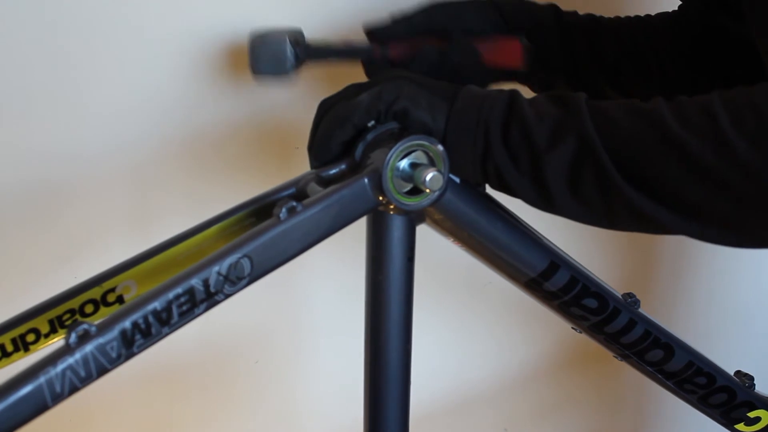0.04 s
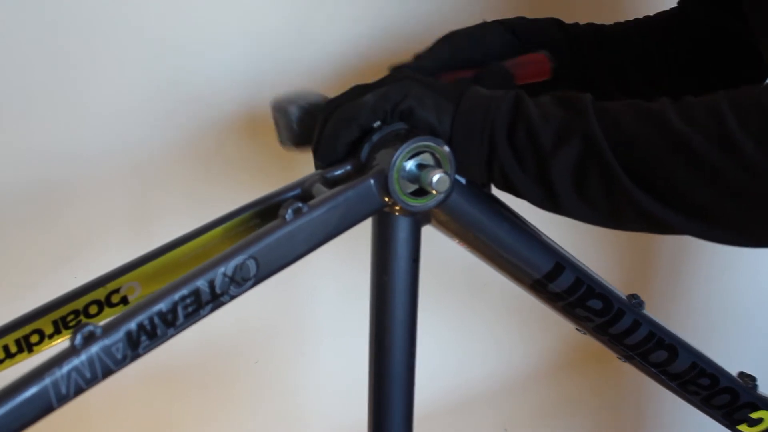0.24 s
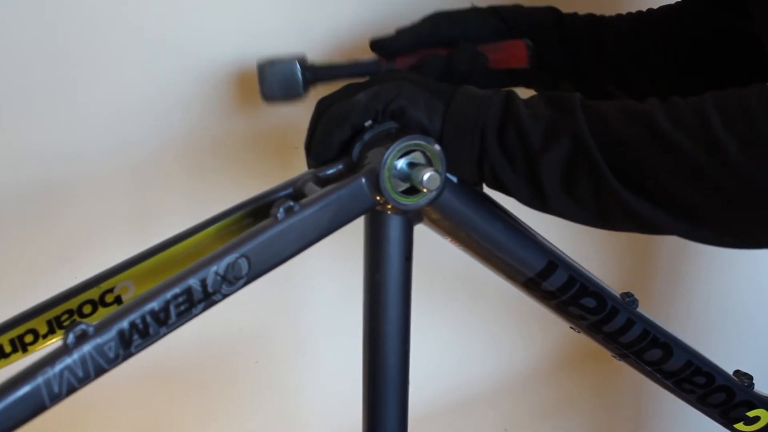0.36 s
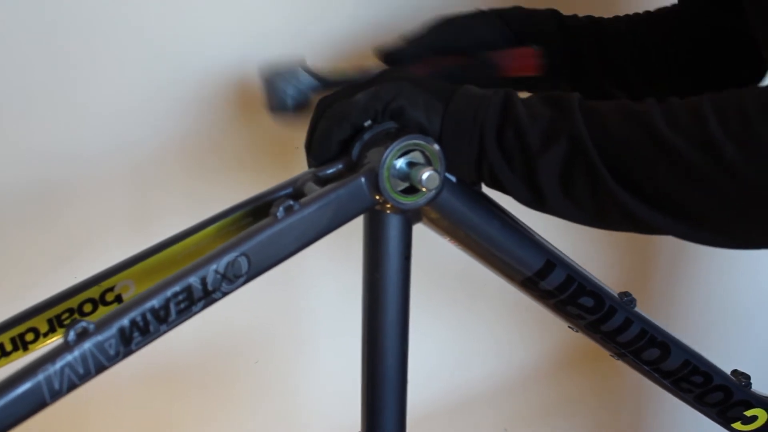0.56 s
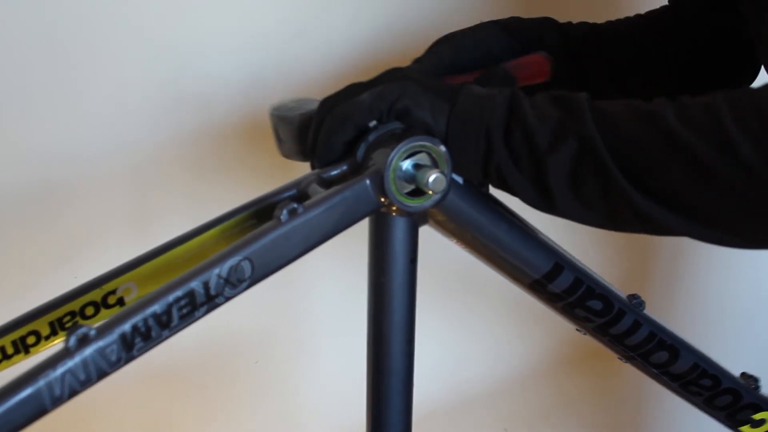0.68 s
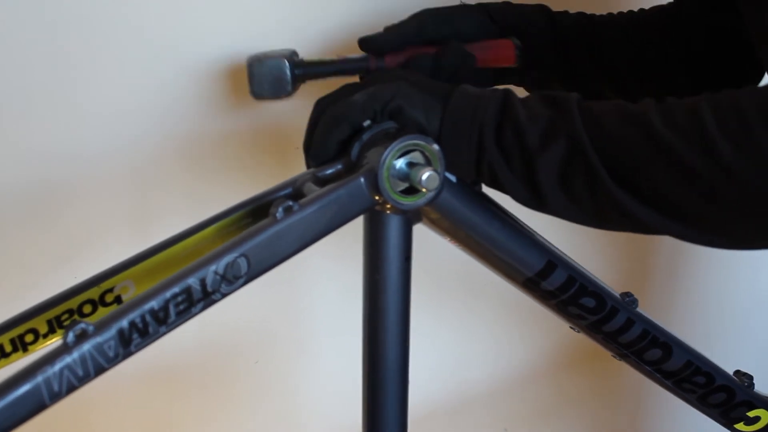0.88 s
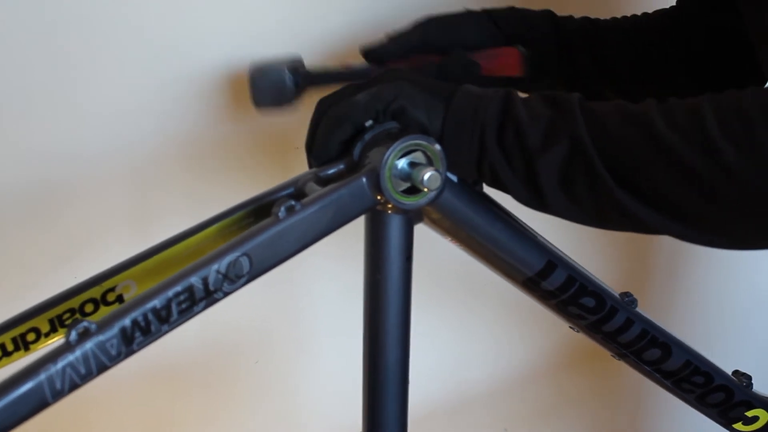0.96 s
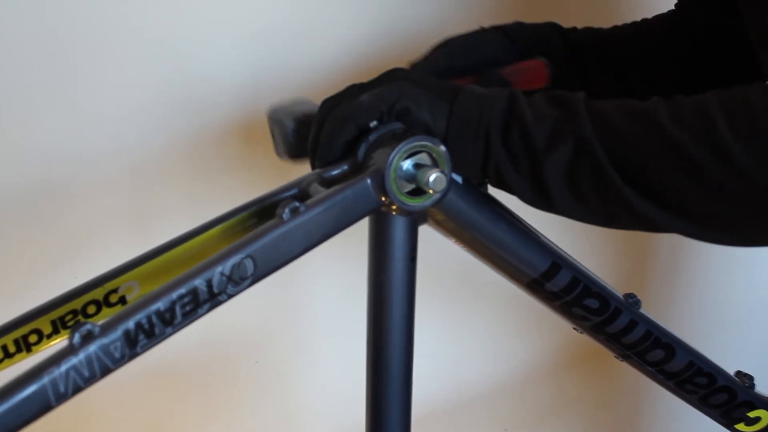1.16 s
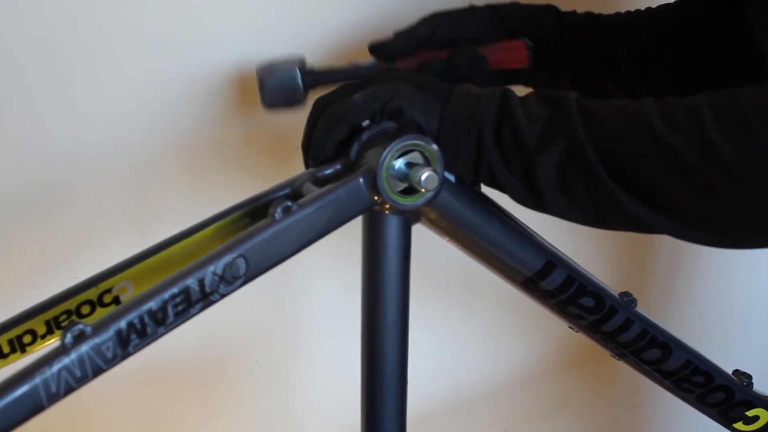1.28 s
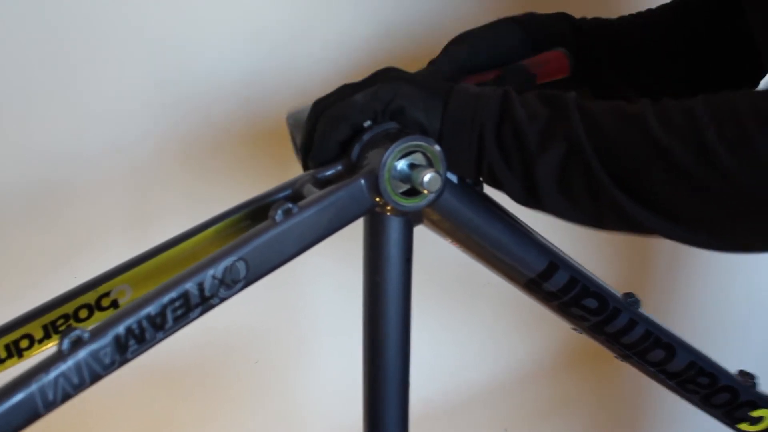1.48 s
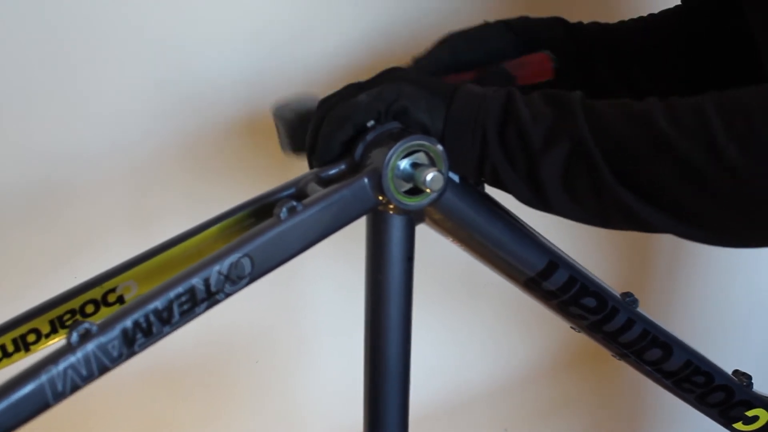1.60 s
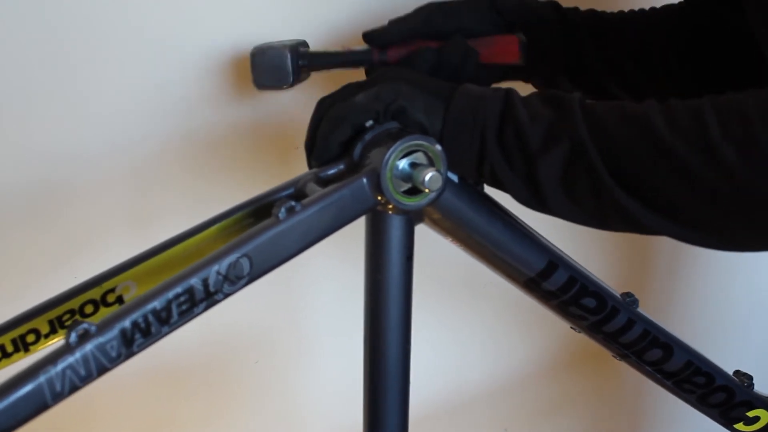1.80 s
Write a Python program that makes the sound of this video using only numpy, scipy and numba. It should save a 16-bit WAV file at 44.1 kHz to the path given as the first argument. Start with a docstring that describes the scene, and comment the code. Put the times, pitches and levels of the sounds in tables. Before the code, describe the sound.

A hammer hits a steel bar set against a bicycle frame bearing, four loud cracking clangs almost half a second apart, with short ring, faint tube hum and small-room reverberation, close single microphone slightly overloading.

```python
"""Four hard metallic blows ring out in a small workshop, over two faint touches and a low room tone.
A steel hammer drives a drift bar against a bearing in an aluminium bicycle frame. Filtered noise makes
the crack and the room's wash; decaying sines ring the bar and hum the frame tubes; shaped noise is the room
tone. The camera's single microphone has a gain control that pulls the room tone down after the
first blow and reacts too late for the first milliseconds of every blow, which overload."""
import sys
import numpy as np
from scipy import signal
from scipy.fft import rfft, irfft
from scipy.io import wavfile
from scipy.ndimage import uniform_filter1d
from numba import njit

SR = 44100
rng = np.random.default_rng(int(sys.argv[2]) if len(sys.argv) > 2 else 0)


def makeup_ratio(level_db):
    """Linear amplitude ratio for a level in decibels (20 dB per factor of ten)."""
    decades = np.asarray(level_db, float) / 20
    return 10 ** decades


def unload_audio(sound):
    """Save the sound as a 16-bit wav file, at the path given as the first command line argument."""
    columns = np.transpose(np.atleast_2d(sound))
    # keep every value between -1 and 1, then stretch to whole-number steps
    steps = np.round(np.clip(columns, -1, 1) * 32767)
    wavfile.write(sys.argv[1], SR, steps.astype(np.int16))


N = 81585  # length in samples

# Moments of the four hammer blows: start_s
BLOW_START = [.1929, .6697, 1.1055, 1.5302]
# Hammer blows, one row each: force_db, brightness (dB per octave about 2 kHz), crack_s (decay constant), hum_db
BLOWS = [(-2.5, -0.5, 0.0066, 2), (-4, -1, .004, 0.5), (-5.5, -2, 0.0062, -0.5), (-5, -1, 0.0052, -1)]
THIN_HZ = 330  # slim tubes radiate little below this


def hammer_blows(t):
    """All blows in the workshop; each new blow stops the frame hum of the last."""
    clang, hum = 0, 0
    stops = BLOW_START[1:] + [np.inf]
    for start, stop, settings in zip(BLOW_START, stops, BLOWS):
        one_clang, one_hum = blow(t - start, *settings)
        clang = clang + one_clang
        hum = hum + one_hum * (t < stop)
    thin = signal.butter(2, THIN_HZ, "high", fs=SR, output="sos")
    return signal.sosfilt(thin, clang) + hum


def blow(t, force_db, tilt_db, crack_s, hum_db):
    """One impact at t = 0: returns its clang (crack, bar, shell, wash) and its frame hum, both scaled by force."""
    clang = crack(t, tilt_db, crack_s) + bar_ring(t, tilt_db) + shell_thud(t) + wash(t, tilt_db)
    return makeup_ratio(force_db) * clang, makeup_ratio(force_db) * frame_hum(t, hum_db)


# Spectrum of the steel contact, relative: pitch_hz, level_db (per Hz)
CONTACT = [(24, -41), (40, -21.5), (881, -7.5), (2640, -6), (3140, -4), (5310, -8.5), (7910, -7),
           (10200, -8.5), (11800, -9.5), (15500, -19.5)]
# Short broad resonances of the knock, added to that spectrum: pitch_hz, width_hz, level_db
KNOCK = [(700, 90, 0), (828, 89, 3.5), (1850, 250, 3.5), (2710, 77, 3.5), (3135, 190, 7.5),
         (4710, 150, 6.5), (5550, 380, 6.5), (7120, 40, 10), (9300, 100, 4), (11700, 200, 5.5),
         (15600, 440, 5.5)]


def contact_noise(n, tilt_db):
    """Broadband noise of steel on steel, coloured by the resonances of the knock, rms 1."""
    return colour(rng.standard_normal(n), CONTACT, tilt_db, KNOCK)


def crack(t, tilt_db, crack_s):
    """The contact itself: noise that rises in 0.15 ms and dies exponentially."""
    gain_db = 20
    rise = np.clip(t / .00015, 0, 1)
    decay = (t >= 0) * np.exp(-np.maximum(t, 0) / crack_s)
    return makeup_ratio(gain_db) * contact_noise(len(t), tilt_db) * decay * rise


# Modes of bar and frame: pitch_hz, level_db (relative), t60_s
RING = [(750, -14, .25), (829, -11, .27), (900, -10, .25), (1048, -13, .3), (1087, -12, .32),
        (1220, -17, .26), (1404, -11, .25), (1530, -12, .27), (1690, -8, .29), (1730, -12, .24),
        (1925, -13, .24), (2090, -13, .3), (2190, -13, .26), (2430, -14, .3), (2465, -13, .28),
        (2948, -12, .29), (3050, -15, .25), (3160, -14, .27), (3208, -14, .29), (4091, -16, .26),
        (4520, -10, .22), (5018, -14, .18), (6180, -17, .24), (6700, -18, .22), (7020, -17, .25),
        (8150, -17, .17)]
RING_ROUGH_DB, RING_ROUGH_HZ = 4, 45  # loose contact makes every mode flutter


def bar_ring(t, tilt_db):
    """Ringing bar and frame: decaying modes whose levels and phases vary from blow to blow."""
    gain_db, scatter_db = 1.5, 1
    chance = rng.random((len(RING), 2))
    tilt = tilt_db * np.log2(np.array(RING)[:, 0] / 2000)
    extra_db = tilt + scatter_db * (2 * chance[:, 0] - 1)
    return makeup_ratio(gain_db) * modes(t, RING, extra_db, 2 * np.pi * chance[:, 1], RING_ROUGH_DB)


# Short modes of the clamped shell: pitch_hz, level_db (relative), t60_s
THUD = [(662, -3.5, .04), (779, -2, 0.024), (870.4, -2, .045), (1692, -5.5, 0.021), (2370, 0.5, .03)]


def shell_thud(t):
    """The clamped shell gives a few heavily damped modes, all starting at zero phase."""
    gain_db = 8
    return makeup_ratio(gain_db) * modes(t, THUD, np.zeros(len(THUD)), np.zeros(len(THUD)))


# Long low modes of the frame tubes: pitch_hz, level_db (before the blow's hum and force), t60_s
HUM = [(283.5, -34, 1.3), (407, -28, 2), (413.3, -21.5, 1.2), (494, -38, .5), (571, -37, .5)]


def frame_hum(t, hum_db):
    """Humming tubes: slow decaying sines, of which the close pair beats."""
    pair_lag = np.pi / 2  # two bending planes of one tube, the upper a quarter cycle late
    return modes(t, HUM, np.full(len(HUM), hum_db), [0, 0, -pair_lag, 0, 0])


# Reverberation of the workshop: pitch_hz, level_db (relative), t60_s
ROOM = [(60, -3, .3), (150, 0, 0.45), (350, 7.5, 0.32), (800, -2, 0.34), (2000, -2, 0.35), (4800, -5, 0.32),
        (8000, -6.5, 0.29), (12000, -8, 0.2), (14500, -7, 0.19), (17000, -5.5, .2)]


def wash(t, tilt_db):
    """Dense overtones of the frame and reflections of the room, each half octave dying at its own rate."""
    gain_db, build_s = 3, 0.002
    late_db, late_stretch = -22.5, 2.135  # a weaker, slower second stage of the decay
    n = SR // 2 + SR // 4
    u = np.arange(n) / SR
    spectrum = rfft(contact_noise(n, tilt_db))
    hz = np.arange(n // 2 + 1) * SR / n + 1e-9
    out = 0
    for centre in 45 * 2 ** np.arange(0, 9, .5):
        share = np.clip(1 - 2 * np.abs(np.log2(hz / centre)), 0, 1)
        band = irfft(spectrum * share, n) * makeup_ratio(read(ROOM, centre))
        t60 = max(read(ROOM, centre, column=2), .02)
        out = out + band * (fade(u, t60) + makeup_ratio(late_db) * fade(u, late_stretch * t60))
    out = out * (1 - np.exp(-u / build_s))
    # place it at t = 0: the first sample is zero, so earlier times stay silent
    k = np.round(t * SR).astype(int)
    return makeup_ratio(gain_db) * out[np.clip(k, 0, n - 1)] * (k < n)


# Light touches of the bar on the frame: start_s, force_db (before the band filter), t60_s (glove damping)
TOUCHES = [(-.02, -42, .4), (.1043, -58.5, .06)]
# Band the touches are heard in: low and high edge in Hz
TOUCH_BAND = [850, 1900]


def light_touches(t):
    """Faint contacts of the bar: the clang of a small blow, damped by the glove and confined to a band."""
    out = 0
    for start, force_db, t60 in TOUCHES:
        clang, _ = blow(t - start, force_db, 0., .0007, 0)
        out = out + clang * fade(t - start, t60)
    return signal.sosfilt(signal.butter(2, TOUCH_BAND, "band", fs=SR, output="sos"), out)


# Spectrum of the empty workshop, relative: pitch_hz, level_db (per Hz)
TONE = [(25, 2), (75, -4), (200, -11), (400, -8), (800, -12.5), (1600, -11.5), (3000, -16.5), (8000, -25),
        (15500, -26), (20000, -37)]


def room_tone(n):
    """Steady hiss and rumble: shaped noise whose level wavers slightly."""
    tone_db = -54  # rms ahead of the gain control
    waver_db = walk(n, 25)
    return makeup_ratio(tone_db + waver_db) * colour(rng.standard_normal(n), TONE)


def modes(t, table, extra_db, phase, rough_db=0.):
    """Sum of struck resonances: decaying sines started at t = 0, with levels that may flutter."""
    out = 0
    for (hz, db, t60), extra, p in zip(table, extra_db, phase):
        level = makeup_ratio(db + extra + rough_db * walk(len(t), RING_ROUGH_HZ))
        out = out + level * fade(t, t60) * np.sin(2 * np.pi * hz * t + p)
    return out


def fade(t, t60):
    """Exponential decay, 60 dB down after t60 s, silent before zero."""
    return (t >= 0) * np.exp(-np.log(1000) * np.maximum(t, 0) / t60)


def walk(n, rate_hz):
    """Random levels held 1 / rate s and slewed."""
    k = int(SR / rate_hz)
    held = rng.standard_normal(n // 100)[np.arange(n) // k]
    return uniform_filter1d(held, k)


def read(table, hz, column=1):
    """Table column on a log-frequency axis."""
    table = np.array(table)
    return np.interp(np.log(np.maximum(hz, 1)), np.log(table[:, 0]), table[:, column])


def colour(x, table, tilt_db=0., bumps=()):
    """Noise shaped by a spectrum, a tilt about 2 kHz and resonant bumps, rms 1."""
    hz = np.arange(len(x) // 2 + 1) * SR / len(x)
    db = read(table, hz) + tilt_db * np.log2(np.maximum(hz, 50) / 2000)
    for centre, width, height_db in bumps:
        db = db + height_db / (1 + (2 * (hz - centre) / width) ** 2)
    y = irfft(rfft(x) * makeup_ratio(db), len(x))
    return y / np.sqrt(np.mean(y ** 2))


def scene():
    """Blows and touches over the room tone, one channel."""
    t = np.arange(N) / SR
    return (hammer_blows(t) + light_touches(t) + room_tone(N))[None]


@njit
def follow(x, attack, release):
    """Level follower, quick up and slow down."""
    e, out = 1e-4, np.empty(len(x))
    for i in range(len(x)):
        e += (abs(x[i]) - e) * (attack if abs(x[i]) > e else release)
        out[i] = e
    return out


def gain_control(dry):
    """Compresses what exceeds a threshold; its follower lags the onset of each blow."""
    top_db, ratio, attack_s, release_s = -10.5, 2.338, .005, 1.8
    level = follow(dry[0], 1 / (attack_s * SR), 1 / (release_s * SR))
    return dry * np.minimum(1, makeup_ratio(top_db) / level) ** (1 - 1 / ratio)


def band_limit(x):
    """A steep low-pass at the top of the band."""
    return signal.sosfilt(signal.butter(12, 15660, fs=SR, output="sos"), x)


def record(dry):
    """The camera's microphone channel: lagging gain control, overload, steep cut of the top."""
    x = np.clip(gain_control(dry), -1, 1)
    top_cut = signal.ellip(8, .2, 60, 16100, fs=SR, output="sos")  # edge in Hz
    x = signal.sosfilt(top_cut, x)
    return band_limit(np.clip(x, -1, 1))


dry = scene()
out = record(dry)
unload_audio(out)
```